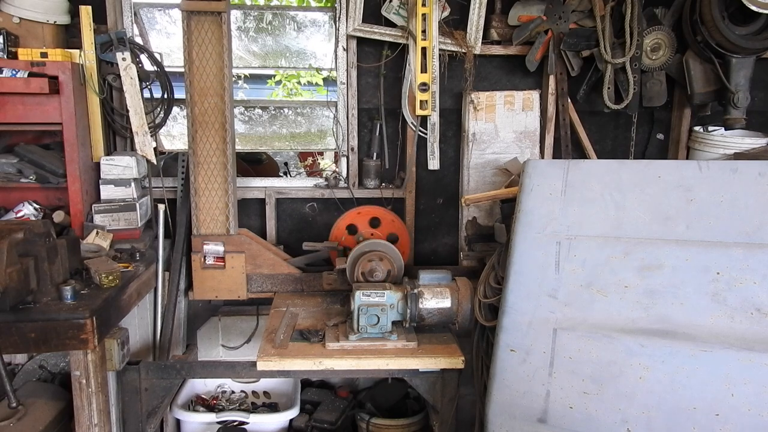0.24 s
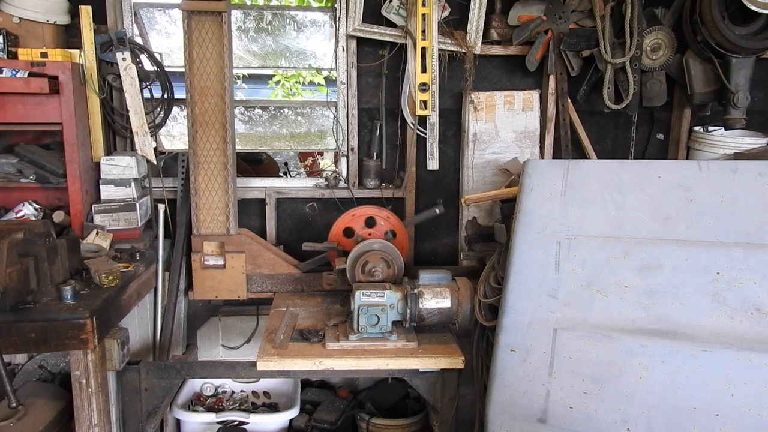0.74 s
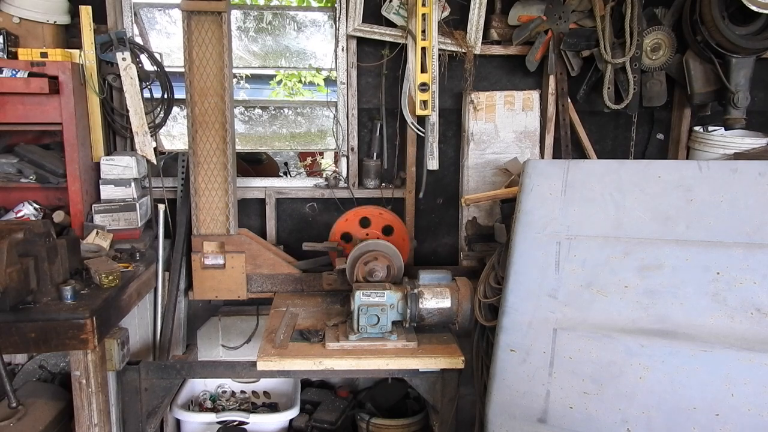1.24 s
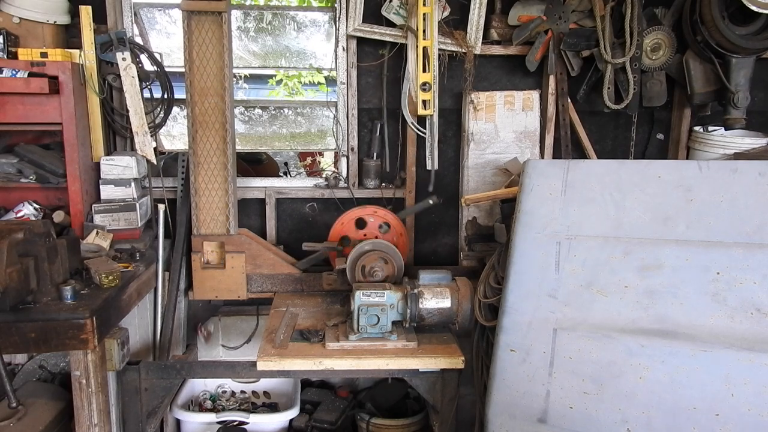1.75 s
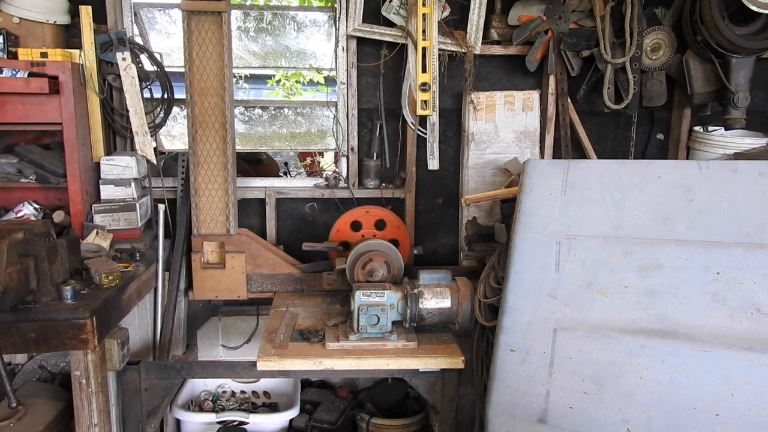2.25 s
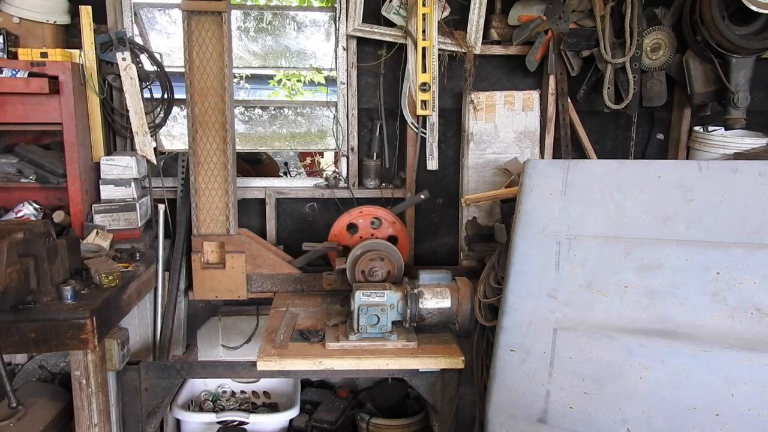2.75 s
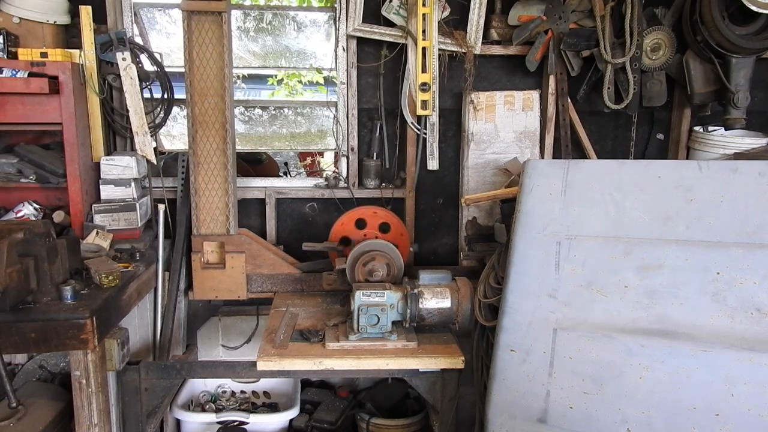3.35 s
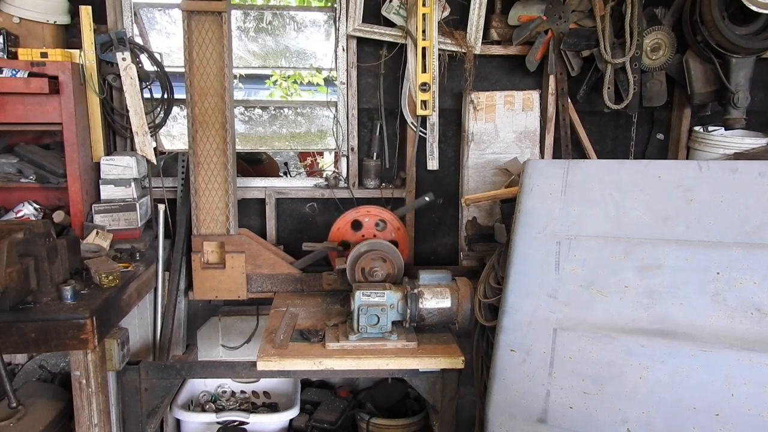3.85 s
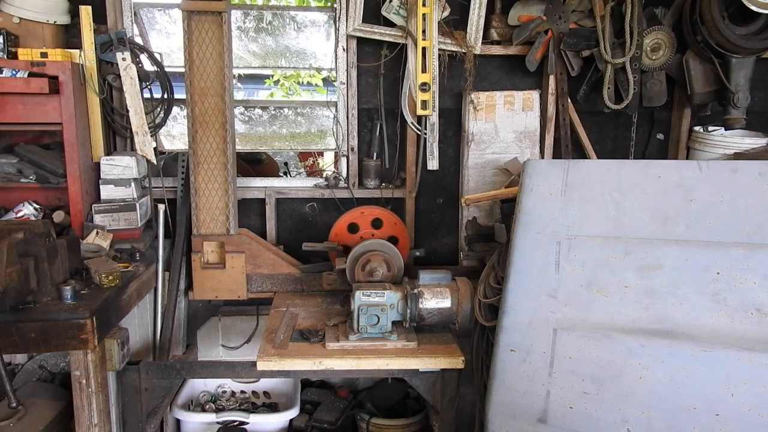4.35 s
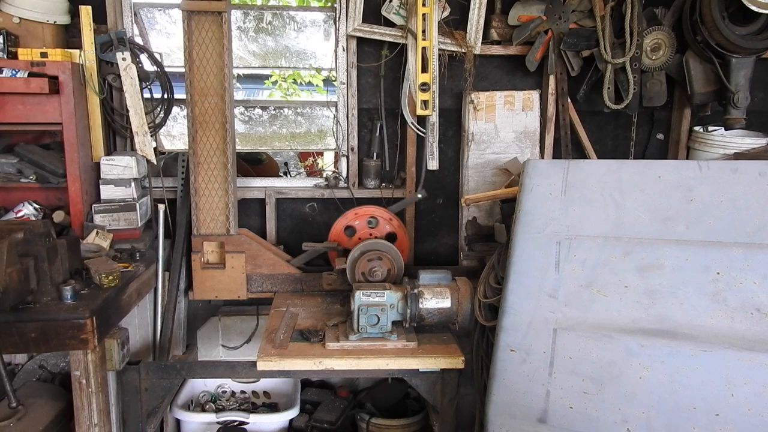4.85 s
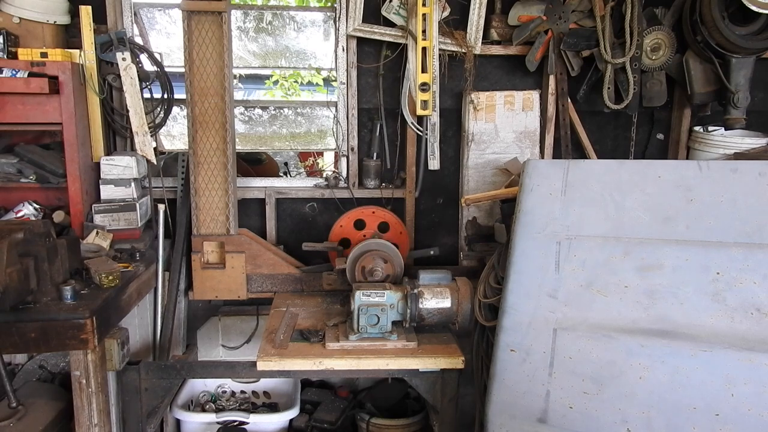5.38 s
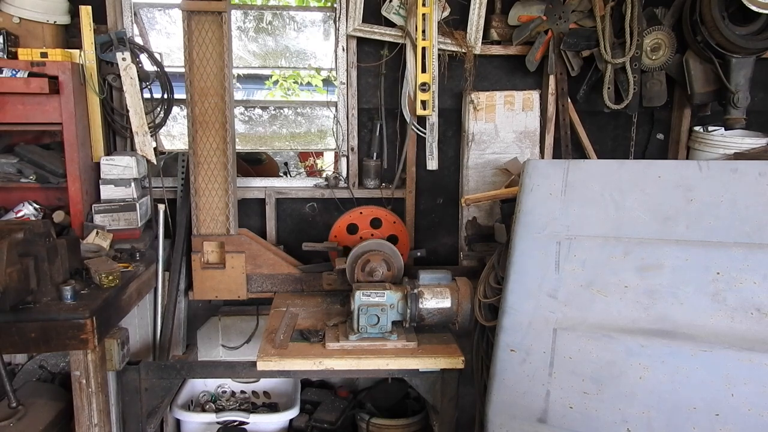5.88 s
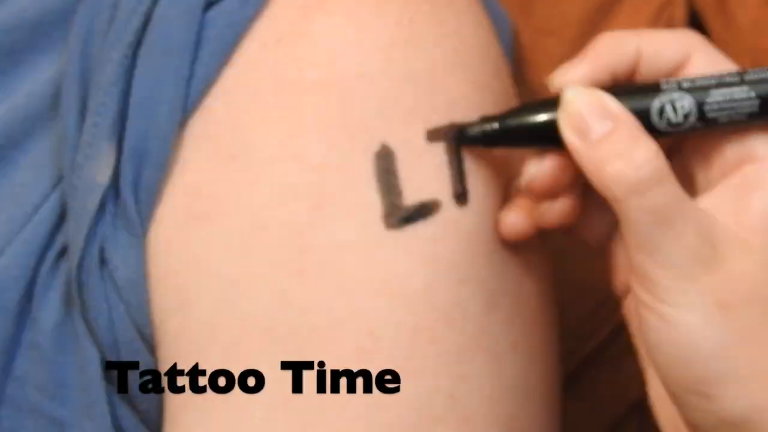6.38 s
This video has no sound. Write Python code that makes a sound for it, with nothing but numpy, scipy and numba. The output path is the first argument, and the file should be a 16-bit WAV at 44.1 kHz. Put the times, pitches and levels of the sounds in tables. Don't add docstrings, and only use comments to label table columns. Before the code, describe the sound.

Thin cans buckle, snap and rattle harshly over a humming motor in a small workshop; scraps drop and clink, the motor runs down, then silence.

```python
import sys
import numpy as np
from scipy import signal
from scipy.io import wavfile
from scipy.ndimage import uniform_filter1d
from numba import njit

SR = 44100
rng = np.random.default_rng(int(sys.argv[2]) if len(sys.argv) > 2 else 0)


def dump(signal):
    limited = np.clip(np.atleast_2d(signal).T, -1, 1)
    pcm = np.round(limited * 32767).astype(np.int16)
    wavfile.write(sys.argv[1], SR, pcm)


def boost_factor(decibels):
    exponent = np.asarray(decibels, float) / 20
    return 10 ** exponent


N = 291930
T = np.arange(N) / SR

# [f/Hz, density/dB]
AIR_SPECTRUM = [(15, -41), (25, -24), (105, 7), (363, -23.5), (887, -29.5), (962, -16), (2160, -33.5),
                (6380, -21.5), (16000, -37.5)]
# [f/Hz, t60/s]
SHOP_DECAY = [(200, 0.18), (1500, 0.3), (6000, 0.21), (12000, 0.12)]
# [f/Hz, side against mid level/dB]
PORT_SPREAD = [(60, -26.5), (110, -34), (200, -34), (380, -29), (700, -26.5), (1290, -21), (2380, -18),
               (4400, -12), (8120, -3.5), (15000, 0.5)]
# [f/Hz, level/dB]
PORT_LEAN = [(300, -53.5), (1000, -17.5), (3000, -26), (9000, -29)]
# [t/s, power level/dB, hum f/Hz, hum level/dB]
MOTOR_RUN = [
    (0, 3.5, 118.9, -45.5),
    (2.8, 1.5, 118.3, -43),
    (5.12, 0.5, 117.1, -42.5),
    (5.17, -18, 108.6, -53),
    (5.24, -19.5, 107.7, -57),
    (6, -30, 106.9, -42),
]
# [shaft order, level/dB]
SLOT_TONES = [(36, -46), (40, -48), (44, -46), (47, -44.5), (48, -39), (49, -42), (50, -43), (52, -38.5),
              (62.5, -55)]
# [f/Hz, density/dB]
WHIRR_SPECTRUM = [(15, -52), (25, -36.5), (102, -11), (249, -5), (427, -5), (476, -15), (531, -4),
                  (988, -12.5), (1440, -5), (1650, -9.5), (2350, -22), (6740, -14.5), (11000, -47),
                  (16000, -83.5)]
# [f/Hz, density/dB]
THIN_METAL = [(18, -61.5), (30, -33), (75, -31.5), (109, -8), (211, -10.5), (247, -3), (339, -4),
              (530, 0.5), (747, -4.5), (1410, -5), (4030, -12.5), (6310, -5), (7200, -9), (13600, -47),
              (16300, -62)]
# [t/s, peak level/dB, f/Hz, t60/s]
CAN_NOTES = [
    (0.787, 1.5, 624, 0.031),
    (0.903, -19.5, 580, 0.093),
    (1.395, -8, 654, 0.15),
    (1.804, -2, 535, 0.097),
    (1.856, -16, 665, 0.083),
    (1.934, -7, 706, 0.085),
    (1.98, -5.5, 660, 0.069),
    (2.217, -7, 680, 0.068),
    (2.32, -14.5, 480, 0.17),
    (2.963, -2.5, 550, 0.078),
]
# [t/s, length/s, f/Hz, level/dB]
RUBBED_TONES = [(0.116, 0.072, 2455, -24), (0.283, 0.16, 651, -24), (.5, 0.049, 170, -20),
                (0.565, 0.14, 248.5, -24), (0.79, 0.41, 644, -24.5), (0.798, 0.34, 587, -26.5),
                (0.786, 0.25, 313.5, -28), (1.239, 0.43, 309.5, -28.5), (1.426, .1, 1207, -25),
                (1.441, 0.06, 5660, -24), (1.655, 0.13, 550, -24.5), (1.854, 0.054, 3290, -21.5),
                (1.855, 0.056, 681, -21.5), (2.283, 0.05, 454, -19.5), (2.679, 0.19, 549, -25.5),
                (2.676, 0.18, 4920, -33), (2.896, 0.087, 6840, -27), (4.726, 0.12, 551, -29),
                (5.185, 0.022, 1815, -32), (5.26, 0.022, 1846, -26.5), (5.412, 0.014, 6280, -28.5),
                (5.572, 0.038, 4440, -29), (5.801, 0.078, 1458, -37), (1.702, .025, 4860, -24),
                (2.08, .07, 3520, -29), (2.399, 0.036, 2750, -23.5), (3.639, 0.027, 2750, -34),
                (4.12, .03, 3620, -39), (4.683, 0.077, 2750, -42.5), (4.69, 0.054, 4300, -35.5),
                (5.043, 0.051, 6240, -38.5), (5.173, .02, 5050, -45.5), (5.188, 0.026, 3650, -39),
                (5.735, .025, 4930, -39), (1.468, .07, 5600, -29)]
# [t/s, peak level/dB, f/Hz]
PANEL_POPS = [(0.189, -6, 1930), (0.228, -10, 894), (0.311, -10.5, 1610), (0.343, -13, 1640),
              (0.511, -2.5, 1640), (0.608, -2, 1960), (0.81, -9, 2080), (0.829, -11.5, 1240),
              (0.889, -11.5, 915), (0.903, -7.5, 1360), (0.997, -7, 1090), (1.025, -4.5, 1190),
              (1.261, -9.5, 1210), (1.299, -6, 1560), (1.419, -16, 807), (1.436, -1.5, 1660),
              (1.477, -15.5, 1200), (1.616, -3, 1050), (1.641, -4.5, 1820), (1.667, -6.5, 1010),
              (1.691, -3, 1790), (1.741, -6, 1850), (2.048, -5, 1280), (2.091, -4.5, 1840),
              (2.12, -9.5, 1300), (2.227, -5, 703), (2.324, -9, 1500), (2.427, -4.5, 1340),
              (2.439, 0.5, 1720), (2.621, -9, 1810), (2.649, -3, 1810), (2.696, 3.5, 1340),
              (2.731, -2.5, 1090), (2.79, -7, 1120), (2.873, -8.5, 1860), (3.694, 0.5, 1480),
              (3.977, -8, 1290), (4.751, -3, 1460), (4.925, -7.5, 1100), (5.632, -6, 1070)]
# [t/s, peak level/dB, f/Hz]
EDGE_TICKS = [(0.1749, -3.5, 6910), (0.1999, 1.5, 5920), (0.2578, 0, 5250), (0.3261, 2, 6550),
              (0.5436, 0.5, 6420), (0.5666, -3.5, 6430), (0.6399, -10.5, 4800), (0.8484, -4.5, 6680),
              (0.9043, -17, 5450), (0.9791, -3.5, 6940), (1.0889, -8, 5900), (1.453, -2, 5400),
              (1.4999, -5.5, 5710), (1.5754, -1, 5700), (1.7434, -7, 6600), (1.9344, -12, 7000),
              (2.3345, -2, 5840), (2.4024, -6.5, 6650), (2.4942, -5, 4440), (2.5141, -4.5, 6700),
              (2.571, -12, 6700), (2.6394, 0, 5630), (2.7032, -10, 3460), (2.8782, -9, 6770),
              (2.9535, -12, 6500), (3.0937, -15, 5840), (3.156, -8.5, 6460), (3.2099, -4, 6560),
              (3.2264, -9.5, 6270), (3.4391, -15, 6320), (3.5556, -18, 6090), (3.626, -20.5, 4240),
              (3.6666, -13.5, 6580), (3.9243, -15, 6660), (4.1619, -6.5, 6250), (4.8921, -14, 6800),
              (4.9939, -18, 3600), (4.9998, -9, 6060), (5.1715, -12, 5000), (5.4159, -17, 6440),
              (5.5466, -18, 6700), (5.574, -12, 6370), (5.6803, -18, 7020), (5.7332, -23, 4920)]
# [t/s, peak level/dB]
HARD_BLOWS = [(0.0808, -3.5), (0.097, 2.5), (0.904, -2), (1.1585, -4.5), (1.168, 0), (1.603, 0.5),
              (2.0082, -2), (2.016, -5), (2.217, -2), (2.245, 1.5), (2.327, 0), (2.615, -2.5), (2.697, -6),
              (2.762, -5), (2.8976, -11), (2.903, -8.5), (3.1882, 0.5), (3.1932, 1.5), (3.316, -5),
              (3.3494, -9), (3.135, -11), (3.157, -18)]
# [t/s, peak level/dB, low thud share/dB]
RAM_BUCKLES = [(0.0802, -7.5, 7.5), (0.0924, -6.5, -12), (0.0988, -8, 6.5), (0.429, -16, -2),
               (0.4761, -2, -5), (0.7852, -13, -14), (1.11, -2, -4), (1.1589, -5.5, 7.5),
               (1.167, -2.5, -10), (1.4089, -1, -8.5), (1.549, 2.5, -8), (1.6007, -8.5, 7),
               (1.8512, 5.5, -28), (2.0084, 3, -14.5), (2.195, 4.5, -5), (2.246, 1, -8), (2.3512, -3.5, -5),
               (2.609, -1, -28.5), (2.761, -3, -20.5)]
# [t/s, peak level/dB, low thud share/dB]
CAN_KNOCKS = [(2.8997, 3.5, -31), (3.0627, -14, 2), (3.113, -12, -11), (3.1328, -12, -8), (3.1888, 0, -22),
              (3.194, 0, -15), (3.3129, 1.5, -28), (3.3486, -0.5, -8.5), (3.3878, -9, -20),
              (3.697, -33, -1), (3.9773, -32, 8), (4.1248, -14, -2), (4.169, -12, -24), (4.1813, -7, 3),
              (4.6966, -21, -23), (4.719, -14, 1.5), (4.9241, -17.5, 5.5), (5.0402, -18, -23.5),
              (5.189, -23, 3), (5.258, -15, -12), (5.2635, -11, -14), (5.5863, -16, -16), (5.6204, -10, -3),
              (5.8227, -25, 2)]
# [t/s, rise/s, hold/s, fizz level/dB]
WALL_TEARS = [(0.085, 0.0028, 0.26, -16.5), (0.429, .004, 0.025, -26), (0.475, .005, 0.032, -14.5),
              (0.537, .015, 0.075, -20), (0.783, .004, 0.018, -13.5), (0.834, .015, 0.18, -19),
              (1.095, .008, 0.025, -22), (1.16, .004, 0.028, -15.5), (1.225, .015, 0.21, -17),
              (1.403, .01, 0.1, -19.5), (1.547, .008, 0.041, -14.5), (1.63, .02, 0.13, -22),
              (1.849, 0.0051, 0.014, -15.5), (1.918, .015, 0.16, -26.5), (2.005, .004, 0.011, -16),
              (2.046, .01, 0.085, -20), (2.195, .004, 0.063, -17), (2.288, .008, 0.06, -16),
              (2.36, .01, 0.12, -18.5), (2.489, .015, 0.029, -20.5), (2.604, .004, 0.028, -14),
              (2.674, .02, 0.14, -22)]
# [t/s, rise/s, hold/s, rattle level/dB, boom against rattle/dB]
PANEL_FOLDS = [(0.001, .01, 0.02, -33.5, 3), (0.087, 0.013, .01, -14, -6), (0.146, .02, 0.19, -18, -2),
               (0.364, .02, 0.014, -26, 1), (0.471, .012, 0.011, -21.5, 0.5),
               (0.515, .02, 0.11, -18.5, -1.5), (0.612, .02, 0.04, -20.5, -0.5),
               (0.782, .006, 0.23, -18.5, -4), (1.032, .02, 0.13, -28.5, -3),
               (1.159, .005, 0.023, -14.5, -7.5), (1.222, .02, .14, -17.5, -4.5),
               (1.397, .03, 0.071, -23.5, 4.5), (1.597, .02, 0.13, -16.5, -1.5),
               (1.79, .02, 0.017, -26.5, -3.5), (1.848, .01, 0.047, -22, -10),
               (1.931, .02, 0.064, -24, -8.5), (2.009, .005, 0.015, -18, -16),
               (2.049, .02, 0.1, -18.5, -2.5), (2.202, .005, 0.046, -16.5, -7.5),
               (2.289, .02, 0.16, -18, -11.5), (2.478, .02, .03, -23, -9.5),
               (2.616, .04, 0.091, -23.5, 1.5), (2.692, .05, 0.12, -17, -2.5), (2.852, .02, .05, -28, -9)]
# [t/s, rise/s, hold/s, fizz level/dB]
CAN_JINGLES = [(2.894, 0.003, 0.016, -23.5), (2.952, .015, 0.011, -29), (3.065, 0.0058, 0.012, -38.5),
               (3.117, 0.003, 0.033, -20), (3.188, .002, 0.0073, -14.5), (3.207, .006, 0.047, -18.5),
               (3.305, .004, 0.041, -19), (3.389, .01, 0.036, -27), (3.563, .004, 0.081, -41),
               (3.688, 0.08, 0.005, -23), (3.695, .004, 0.0084, -18), (4.124, .003, 0.012, -28),
               (4.17, .005, 0.008, -26.5), (4.179, 0.0065, 0.008, -16), (4.194, .008, 0.017, -22),
               (4.693, .004, 0.0089, -23), (4.72, 0.0069, 0.0092, -18.5), (4.92, 0.046, 0.025, -30.5),
               (5.028, 0.003, 0.0071, -30), (5.258, .003, 0.011, -15), (5.422, .003, 0.011, -39),
               (5.585, 0.014, .02, -18.5), (5.589, 0.065, .025, -24), (5.669, 0.0091, 0.01024, -30),
               (5.732, .01, .01, -34), (5.816, .002, .01, -34)]
# [t/s, rise/s, hold/s, rattle level/dB, boom against rattle/dB]
CAN_TUMBLES = [(2.958, 0.019, 0.0062, -27, -7.5), (3.111, .005, 0.038, -27.5, 5),
               (3.192, .002, 0.059, -20.5, -3.5), (3.303, 0.0098, 0.15, -29, -7),
               (3.678, 0.066, 0.0092, -22.5, -4.5), (3.698, .005, 0.0045, -15, -2.5),
               (3.977, .006, 0.0045, -24, 1), (4.187, 0.03, 0.0043, -19, -0.5),
               (4.708, 0.009, 0.024, -29.5, -1), (4.75, 0.0056, 0.007, -20, 0.5),
               (4.838, 0.033, 0.045, -34.5, 5), (4.925, .003, 0.0069, -22, -2),
               (5.191, 0.015, 0.025, -36.5, 2.5), (5.257, 0.004, 0.021, -26.5, -2.5),
               (5.438, 0.039, 0.15, -43.5, 4.5), (5.619, 0.05, 0.0064, -17, -3.5),
               (5.706, .02, 0.032, -36.5, -5.5), (5.817, .015, 0.018, -34, -9.5)]

AIR_DB, WHIRR_DB = -46, -27.5
SHAFT_HZ, TURN_S = 29.645, 4.003
WOBBLE_TURNS, SLIP_TURNS = .003, .1
POP, TICK = (-5, 0.07, 0.13), (-5.5, .03, .06)  # level/dB, t60/s, spread of the neighbouring modes
SPIKE_S = .00017
SNAP_T60_S, SNAP_HZ, SNAP_SPREAD = 0.063, 6650, 0.051
# sag while held dB/s, release dB/s, loose scraps settling dB, their fading dB/s
BOOM, RATTLE = (14.5, 198.5, -15.5, 35), (-2, 232.5, -21, 23)
FIZZ, SPARKLE = (10.5, 203, -27.5, 25), (24.5, 251, -21, 24.5)
JINGLE, JINGLE_HZ = (21.5, 273, -21.5, 13.5), [5900, 7450]
RISE_DB = 20
SETTLE_S, SHAKE = 0.29, .3
EDGE_DB, EDGE_DB_PER_DOUBLING = -26.5, -2
ROLL_HZ, FADE_S, FADE_DB_PER_S, CUT_S = 15400, 5.66, 22.5, 5.992


def evened(x):
    return x / np.sqrt(np.mean(x ** 2) + 1e-20)


def read(points, hz):
    f, value = np.transpose(points)
    return np.interp(np.log(hz + 1), np.log(f + 1), value)


def follow(rows):
    s, *columns = np.transpose(rows)
    return [np.interp(T, s, c) for c in columns]


def filtered(x, order, hz, kind="low"):
    return signal.sosfilt(signal.butter(order, hz, kind, fs=SR, output="sos"), x)


def colour(x, points):
    level_db = np.maximum(read(points, abs(np.fft.fftfreq(8192, 1 / SR))), -100)
    log_gain = np.log(boost_factor(level_db))
    taps = np.fft.ifft(np.exp(np.conj(signal.hilbert(log_gain)))).real[:4096]
    return signal.oaconvolve(x, taps)[:len(x)]


def wander(hz):
    return evened(signal.lfilter(*signal.butter(2, hz, fs=SR), rng.standard_normal(N)))


def ring(hz, t60, rise=.0003):
    t = T[:4000]
    return np.sin(2 * np.pi * hz * t) * boost_factor(-60 * t / t60) * np.clip(t / rise, 0, 1)


def add(mix, s, sound):
    part = mix[round(s * SR):][:len(sound)]
    part += sound[:len(part)]


def air():
    return boost_factor(AIR_DB - 4) * evened(colour(rng.standard_normal(N), AIR_SPECTRUM))


def tail(t60_scale):
    taps = np.zeros(SR // 3)
    at = np.arange(100, len(taps) - 22, 22)
    taps[at + rng.integers(0, 22, len(at))] = rng.choice([-1., 1.], len(at))
    hz, t, z = signal.stft(taps, SR, nperseg=256)
    t60 = t60_scale * read(SHOP_DECAY, hz)[:, None]
    out = signal.istft(z * boost_factor(-60 * t / t60), SR, nperseg=256)[1]
    return out / np.linalg.norm(out)


def echoed(x, t60_scale):
    turn = 2 * np.pi * 1.4 * T
    return sum(signal.oaconvolve(x * part, tail(t60_scale))[:N] for part in (np.sin(turn), np.cos(turn)))


def motor():
    power_db, hum_hz, hum_db = follow(MOTOR_RUN)
    turns = SHAFT_HZ * (T - TURN_S) + WOBBLE_TURNS * wander(hz=2)
    whine = np.zeros(N)
    for order, db in SLOT_TONES:
        level = boost_factor(db + 3 + 2 * wander(hz=5))
        slip = SLIP_TURNS * rng.standard_normal()
        whine += level * np.cos(2 * np.pi * (order * turns + slip))
    hum_phase = 2 * np.pi * np.cumsum(hum_hz + 3 * wander(hz=6)) / SR
    hum = boost_factor(hum_db + 1.5 + 4 * wander(hz=15)) * np.sin(hum_phase)
    throb = boost_factor(0.57 * np.cos(2 * np.pi * turns) + 2.7 * wander(hz=25))
    whirr = boost_factor(WHIRR_DB - 3.0) * evened(colour(rng.standard_normal(N), WHIRR_SPECTRUM) * throb)
    return boost_factor(power_db) * whine + boost_factor(0.35 * power_db) * whirr + hum


def songs():
    out = np.zeros(N)
    noises = rng.standard_normal((len(RUBBED_TONES), 2, 20000))
    for (s, length, hz, db), noise in zip(RUBBED_TONES, noises):
        t = T[:round(length * SR)]
        tremble = uniform_filter1d(noise[0] + 1j * noise[1], size=900)[:len(t)]
        tone = ((1.6 + tremble / tremble.std()) * np.exp(2j * np.pi * hz * t)).real
        add(out, s, boost_factor(db) * evened(tone) * signal.windows.tukey(len(t), .6))
    return out


def bonks():
    out = np.zeros(N)
    for s, db, hz, t60 in CAN_NOTES:
        add(out, s, boost_factor(db - 4.0) * ring(hz, t60, rise=0.0047))
    return out


def dents(rows, kind):
    level_db, t60, spread = kind
    out = np.zeros(N)
    for (s, db, hz), near in zip(rows, rng.standard_normal((len(rows), 4))):
        neighbours = sum(ring(hz * np.exp(spread * k), 0.26 * t60) for k in near)
        modes = ring(hz, t60) + 0.33 * neighbours
        push = 1.2 * ring(.8 * hz, .004)
        add(out, s - .001, boost_factor(db + level_db - 5) * (modes + push))
    return out


def spikes():
    out, u = np.zeros(N), T[:200] / SPIKE_S
    push = np.e * u * (1 - u / 2) * np.exp(-u) * 1.4
    for (s, db), sign in zip(HARD_BLOWS, rng.choice([-1., 1.], len(HARD_BLOWS))):
        add(out, s, sign * boost_factor(db) * push)
    return out


def snaps():
    out, t, t60 = np.zeros(N), T[:4000], SNAP_T60_S
    rows = RAM_BUCKLES + CAN_KNOCKS
    noise = rng.standard_normal((len(rows), 2, len(t)))
    cracks = filtered(noise[:, 0].ravel(), 2, [2500, 9500], "band")
    cracks = evened(colour(cracks, THIN_METAL)).reshape(-1, len(t))
    thuds = evened(filtered(noise[:, 1], 2, [250, 2500], "band"))
    rings_hz = SNAP_HZ * (1 + SNAP_SPREAD * rng.standard_normal(len(rows)))
    crack_fade = boost_factor(-60 * t / t60) + 0.9 * boost_factor(-60 * t / 0.0021)
    thud_fade = boost_factor(-60 * t / (1.5 * t60)) * np.clip(t / 0.00052, 0, 1)
    for (s, db, thud_db), crack, thud, hz in zip(rows, cracks, thuds, rings_hz):
        crack = crack * crack_fade + .5 * ring(hz, 1.8 * t60)
        thud = thud * thud_fade + 3.5 * ring(750, .007)
        add(out, s, boost_factor(db - 15) * (crack + boost_factor(thud_db) * thud))
    return filtered(out, 3, 10500)


@njit
def struck(at, size, turn, fade, count):
    out = np.zeros(count)
    for k in range(len(at)):
        step = fade[k] * np.exp(1j * turn[k])
        z = size[k] + 0j
        for i in range(at[k], min(count, at[k] + int(4 / (1 - fade[k])))):
            out[i] += z.imag * min(1., (i - at[k]) * turn[k] / 6)
            z *= step
    return out


def buckles(lo_hz, hi_hz, per_s, cycles, spread_db, clumps, shape_s=.07, count=14):
    at = np.flatnonzero(rng.random(N) < per_s / SR)
    patch = rng.integers(0, count, len(at))
    shape = ((at / SR + shape_s * patch / count) / shape_s).astype(int)
    place = (np.arange(count) + rng.random((N // 500, count))) / count
    turn = 2 * np.pi * lo_hz * (hi_hz / lo_hz) ** place[shape, patch] / SR
    fade = boost_factor(-60 * turn / (2 * np.pi * cycles))
    strength = boost_factor(spread_db * np.minimum(rng.exponential(1, len(at)), 4))
    size = strength * clumps[at] * turn
    rings = colour(struck(at, size, turn, fade, N), THIN_METAL)
    force = np.sqrt(abs(uniform_filter1d(rings ** 2, size=1800)) + 1e-12)
    return evened(rings / force ** .85)


def bursts(s, rise, hold, db, layer):
    sag, release, settle_db, fading = layer
    t = T[::32, None] - s
    after = np.maximum(t, 0)
    held = np.clip(t, 0, abs(hold))
    burst_db = db + RISE_DB * np.minimum(t, 0) / abs(rise) - sag * held - release * (after - held)
    scraps_db = db + settle_db - fading * after - release * np.maximum(t - SETTLE_S, 0)
    scraps_db += SHAKE * follow(MOTOR_RUN)[0][::32, None]
    power = (t > -abs(rise)) * boost_factor(2 * burst_db) + (t > 0) * boost_factor(2 * scraps_db)
    return np.interp(T, T[::32], np.sqrt(power.sum(1)))


def crumple():
    *fold, fold_db, hollow_db = np.transpose(PANEL_FOLDS + CAN_TUMBLES)
    *tear, tear_db = np.transpose(WALL_TEARS + CAN_JINGLES)
    edge_db = EDGE_DB + EDGE_DB_PER_DOUBLING * np.log2(abs(tear[1]) * 200)
    clumps = boost_factor(2. * wander(hz=50))
    boom = buckles(130.0, 785, per_s=600, cycles=19.3, spread_db=2.5, clumps=clumps, count=10)
    rattle = buckles(799.7, 4100, per_s=3200, cycles=52, spread_db=2.4, clumps=clumps, count=18)
    fizz = buckles(4092, 10284, per_s=6500, cycles=130, spread_db=1.8, clumps=clumps, count=20)
    sparkle = buckles(10200, 14000, per_s=2900, cycles=330, spread_db=5.0, clumps=clumps, count=14)
    sparkle = evened(filtered(sparkle, 4, 10000, "high"))
    fizz = filtered(fizz, 6, 10500)
    flat_fizz = evened(fizz + 0.933 * filtered(fizz, 1, JINGLE_HZ, "band"))
    out = bursts(*fold, fold_db + hollow_db, BOOM) * boom
    out += bursts(*fold, fold_db, RATTLE) * rattle
    out += bursts(*np.transpose(WALL_TEARS), FIZZ) * fizz
    out += bursts(*np.transpose(CAN_JINGLES), JINGLE) * flat_fizz
    return out + bursts(*tear, tear_db + edge_db, SPARKLE) * sparkle


def scene():
    cans = crumple() + snaps() + spikes() + bonks() + songs()
    cans += dents(PANEL_POPS, POP) + dents(EDGE_TICKS, TICK)
    machine = motor()
    mid = cans + machine + boost_factor(-10.5) * signal.oaconvolve(cans, tail(0.72))[:N] + air()
    scattered = echoed(cans + machine, .5)
    side = colour(scattered, PORT_SPREAD) - colour(mid, PORT_LEAN)
    return np.array([mid + side, mid - side])


def gated(x):
    treble_db, whim_db, dropped = -39.5, 5, .45
    hz, t, z = signal.stft([x[0] + x[1], x[0] - x[1]], SR, nperseg=2048)
    band = np.repeat(uniform_filter1d(abs(z) ** 2, size=16, axis=1)[:, 8::16], 16, axis=1)
    band = np.concatenate([band, band[:, -1:]], axis=1)
    top, low = hz > 10800, hz < 4300
    whim = np.repeat(rng.standard_normal((len(t), 65)).T, 16, axis=0)[:len(hz)]
    z[:, top] *= band[:, top] > band[0].mean(0) * boost_factor(2 * (treble_db + whim_db * whim[top]))
    width = band[1, low] / (band[0, low] + 1e-20)
    z[1, low] *= width > np.quantile(width, dropped, axis=1, keepdims=True)
    mid, side = signal.istft(z, SR, nperseg=2048)[1][:, :N] / 2
    return np.array([mid + side, mid - side])


def top_cut(x):
    return signal.sosfilt(signal.butter(12, 16450, fs=SR, output="sos"), x)


def record(dry):
    limited = dry / (1 + (dry / 1.15) ** 6) ** (1 / 6)
    rolled = filtered(limited, 8, ROLL_HZ)
    rolled = filtered(rolled, 1, 60, "high")
    fade = boost_factor(-FADE_DB_PER_S * np.maximum(T - FADE_S, 0))
    cut = np.clip((CUT_S - T) / 0.0045, 0, 1) * fade
    hiss = boost_factor(-108) * rng.standard_normal(dry.shape)
    return top_cut(gated(rolled) * cut + hiss)


dry = scene()
out = record(dry)
dump(out)
```